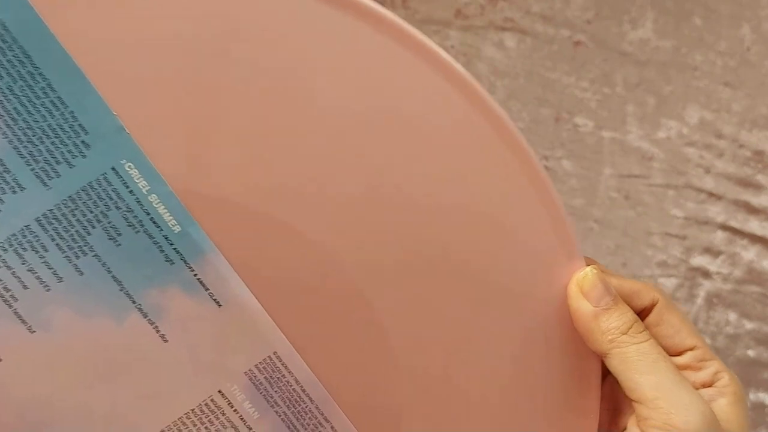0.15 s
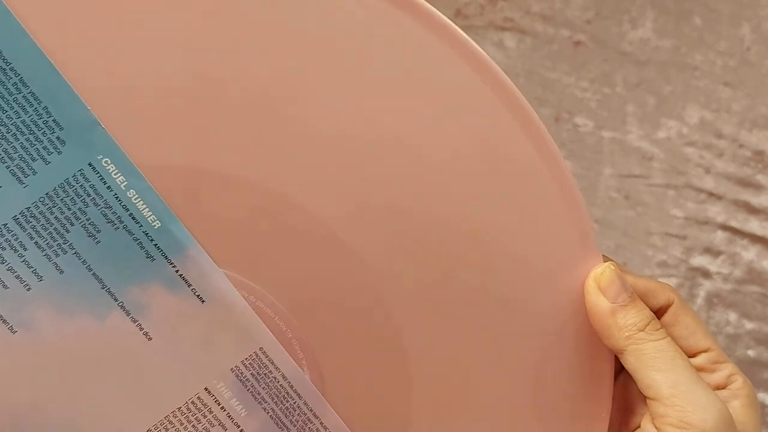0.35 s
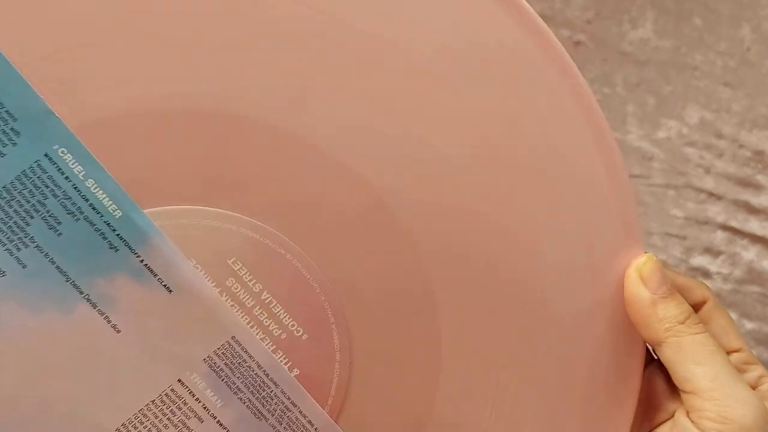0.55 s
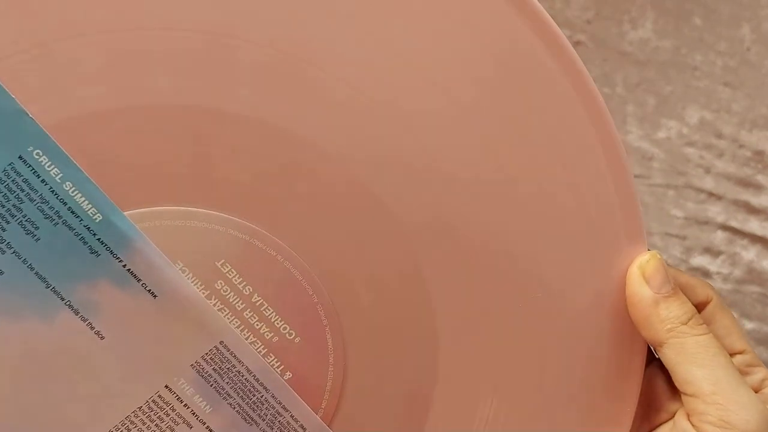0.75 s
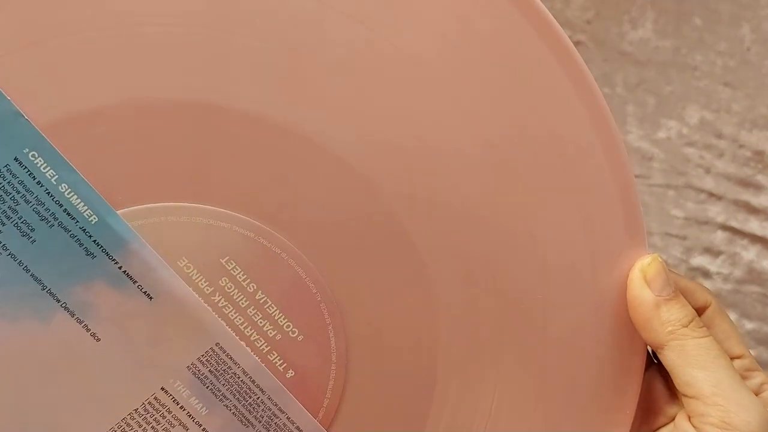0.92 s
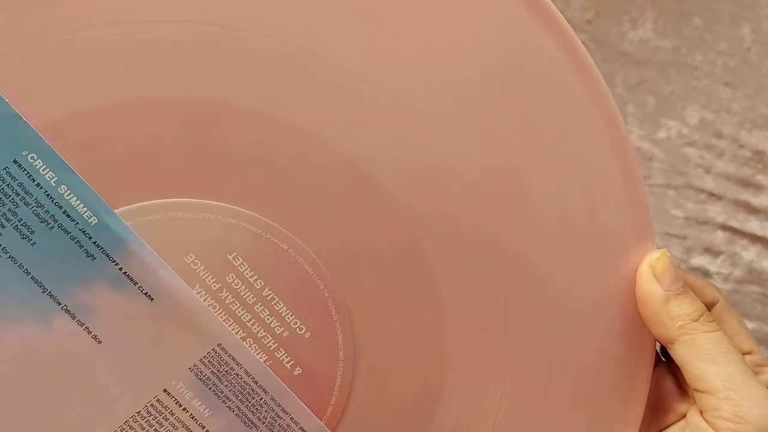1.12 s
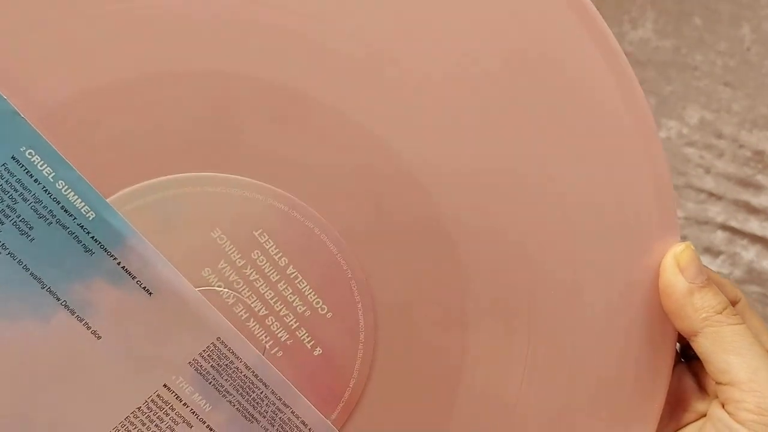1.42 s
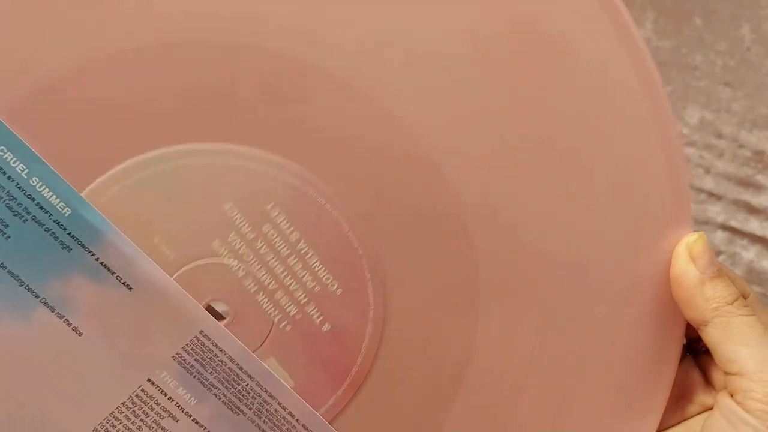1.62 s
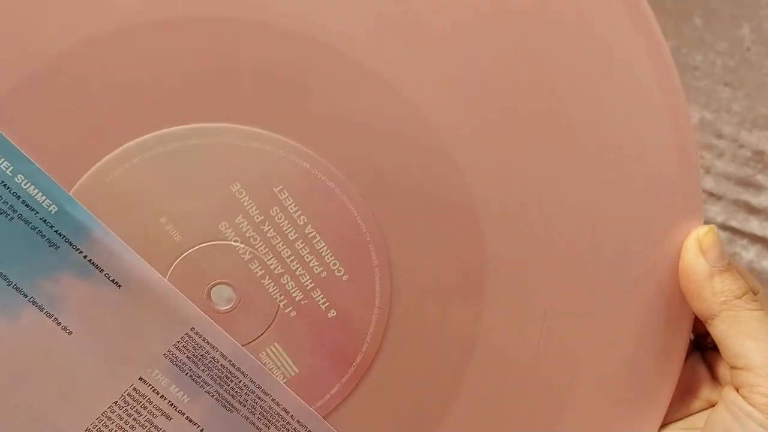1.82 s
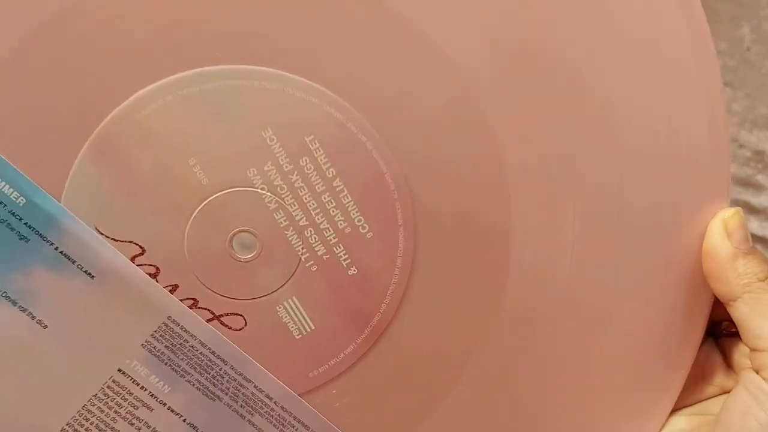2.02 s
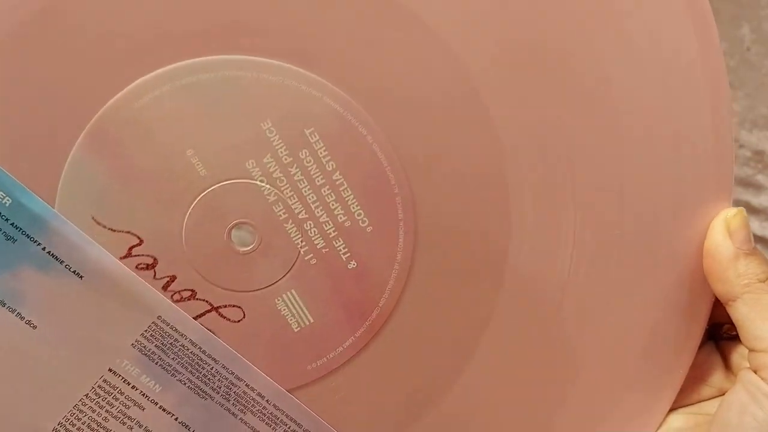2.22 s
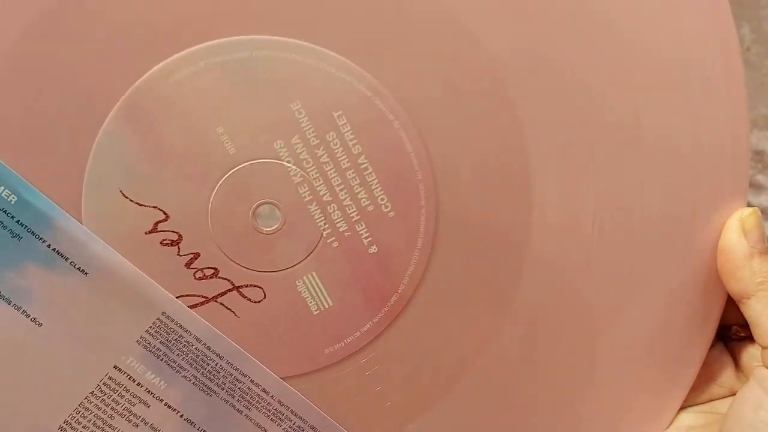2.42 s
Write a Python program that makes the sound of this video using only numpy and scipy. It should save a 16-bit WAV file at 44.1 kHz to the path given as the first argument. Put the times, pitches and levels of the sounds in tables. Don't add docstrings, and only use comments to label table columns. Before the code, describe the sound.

A vinyl record slides from a paper sleeve: harsh rasping jerks with squeaks, snaps and dull knocks, then a near-quiet gap and shorter, softer scrapes, heard very close in a quiet room.

```python
import sys
import numpy as np
from scipy import signal
from scipy.fft import rfft, irfft
from scipy.io import wavfile
from scipy.ndimage import uniform_filter1d

SR = 44100
rng = np.random.default_rng(int(sys.argv[2]) if len(sys.argv) > 2 else 0)


def generate_wav(signal):
    frames = np.transpose(np.atleast_2d(signal))
    scaled = np.clip(frames, -1, 1) * 32767
    pcm = np.round(scaled).astype(np.int16)
    wavfile.write(sys.argv[1], SR, pcm)


def voltage_ratio(decibels):
    exponent = np.asarray(decibels, float) / 20
    return 10 ** exponent


N = 112454


def evened(x):
    return x / np.sqrt(np.mean(x ** 2) + 1e-20)


def smoothed(x, size, axis=-1):
    return uniform_filter1d(uniform_filter1d(x, size, axis=axis), size, axis=axis)


def read_spectrum(points, hz):
    f, db = np.transpose(points)
    return np.interp(np.log(hz + 1), np.log(f + 1), db, left=-90, right=-90)


def coloured(x, points):
    hz = np.fft.rfftfreq(len(x), 1 / SR)
    return evened(irfft(rfft(x) * voltage_ratio(read_spectrum(points, hz)), len(x)))


def add(mix, start_s, sound):
    part = mix[max(round(start_s * SR), 0):][:len(sound)]
    part += sound[:len(part)]


# time in seconds, swell in dB.
CATCHES = [(.016, 4), (.023, 5), (.184, 4), (.268, 3), (.277, 2), (.498, 3), (.118, 4), (.134, 5), (.57, 4),
           (.5735, 4), (1.373, 5), (1.383, 5), (1.394, 5), (1.405, 6), (1.409, 4), (1.419, 4), (1.605, 9),
           (1.625, 5), (1.637, 4), (1.666, 4), (1.673, 5), (1.917, 4), (1.942, 6), (1.948, 6), (1.998, 5),
           (2.009, 5), (2.281, 6), (2.311, 10), (2.333, 14), (2.349, 9), (2.359, 5), (2.371, 5)]


def slips():
    slips_per_s, spread_db = 16000, 0.8
    judder_db, judder_s, mottle_db = 0.7, 0.004, 4.0
    catch_s, catch_hz = 0.0012, 3300

    struck = rng.random(N) < slips_per_s / SR
    size = voltage_ratio(spread_db * rng.exponential(1, N)) * struck * rng.standard_normal(N)
    judder = evened(smoothed(rng.standard_normal(N), round(judder_s * SR)))
    z = signal.stft(size * voltage_ratio(judder_db * judder), nperseg=512, noverlap=384)[2]

    blotches = rng.standard_normal(z.shape)
    blotches = uniform_filter1d(uniform_filter1d(blotches, 2, axis=0), 7, axis=1)
    z = z * voltage_ratio(mottle_db * evened(blotches))
    spray = signal.istft(z, nperseg=512, noverlap=384)[1][:N]

    s, db = np.transpose(CATCHES)
    swell_db = db @ np.exp(-((np.arange(N) / SR - s[:, None]) / catch_s) ** 2)
    hz = np.fft.rfftfreq(N, 1 / SR)
    treble = 1 / (1 + (catch_hz / (hz + 1)) ** 8)
    return rfft(spray) + rfft(spray * (voltage_ratio(swell_db) - 1)) * treble


# frequency in Hz, level in dB per Hz.
PAPER = [(600, -56), (1700, -48), (3200, -14), (5500, -3), (8100, -11), (9000, -4), (12500, -4),
         (15700, -14)]
# time in seconds, level in dB.
HARD_PULLS = [
    [(0, -27), (.012, -34), (.032, -43), (.042, -40), (.078, -57), (.095, -66)],
    [(.08, -62), (.098, -54), (.112, -41), (.2, -26), (.232, -26), (.25, -23), (.278, -23), (.36, -80)],
    [(.365, -80), (.482, -22), (.514, -12), (.552, -12), (.562, -19), (.578, -23), (.625, -60), (.71, -98)],
    [(1.3, -74), (1.334, -64), (1.38, -37), (1.418, -35), (1.44, -44), (1.475, -68), (1.53, -80)],
    [(1.52, -82), (1.574, -58), (1.6, -42), (1.63, -26), (1.652, -29), (1.69, -29), (1.72, -46),
     (1.78, -82)],
    [(1.83, -88), (1.87, -70), (1.916, -37), (1.97, -33), (2.012, -28), (2.04, -48), (2.085, -85)],
]
# centre in Hz, width in Hz, dB over the paper top.
HARD_PATCHES = [
    [(3100, 1200, -5), (4100, 700, 4), (5000, 900, 5), (6300, 900, 3), (10400, 400, 6), (12300, 500, 2)],
    [(1000, 900, -41), (1850, 450, -15), (2750, 900, -4), (5400, 1500, 6), (6600, 700, 3), (9300, 450, 4)],
    [(2600, 900, -1), (4200, 1000, -2), (5300, 800, 6), (6800, 900, 1), (8900, 1000, 3), (10800, 1000, 1)],
    [(2200, 600, -12), (2750, 400, 3), (3700, 600, 4), (4600, 730, 7.5), (5800, 500, 2), (7000, 900, 2),
     (12000, 2200, 3)],
    [(2150, 700, -15), (3400, 900, 1), (4400, 700, 2), (5600, 700, 5), (7300, 700, 1), (11500, 2600, 3)],
    [(3500, 500, -2), (4300, 800, 8.5), (7420, 1000, 5), (12200, 800, 4)],
]
# time in seconds, level in dB.
LIGHT_BRUSHES = [
    [(.8, -95), (.815, -74), (.88, -66), (.93, -72), (.95, -90)],
    [(.95, -89), (1.012, -49), (1.056, -48), (1.19, -96)],
    [(2.13, -98), (2.19, -56), (2.23, -58), (2.3, -80)],
    [(2.2, -88), (2.28, -58), (2.34, -48), (2.38, -53), (2.43, -86)],
    [(2.47, -92), (2.53, -73), (2.55, -62.5)],
]
# centre in Hz, width in Hz, dB over the paper top.
BRUSH_PATCHES = [
    [(5100, 600, 17), (12900, 250, 5), (14700, 250, 3)],
    [(3000, 500, 22), (3800, 600, 35)],
    [(3650, 250, 22), (4200, 480, 32.5)],
    [(4400, 400, 2), (6100, 300, 3), (7700, 800, 19), (8860, 850, 19)],
    [(3500, 300, 5.5), (8700, 500, 22.5)],
]
# time in seconds, level in dB.
EDGE_DRAGS = [
    [(1.21, -95), (1.27, -80), (1.52, -78), (1.6, -95)],
    [(1.95, -60), (2.008, -33), (2.03, -46), (2.075, -75)],
    [(1.6, -90), (1.68, -72), (1.76, -84), (1.83, -78), (1.9, -92)],
    [(2.2, -92), (2.35, -72), (2.55, -82)],
    [(0, -70), (.07, -76), (.25, -80), (.36, -84), (.46, -86), (.5, -90)],
    [(1.86, -90), (1.94, -80), (2.05, -76), (2.1, -90)],
    [(1.56, -80), (1.625, -42), (1.69, -72)],
]
# centre in Hz, width in Hz, dB over the paper top.
EDGE_PATCHES = [
    [(2800, 2000, 20)],
    [(2950, 950, 20)],
    [(1050, 300, 30)],
    [(1050, 500, 30), (1780, 200, 30), (2600, 900, 27)],
    [(1200, 1600, 30)],
    [(1200, 1500, 30)],
    [(2100, 1000, 25)],
]


def jerks():
    drive, out = slips(), np.zeros(N)
    hz, t = np.fft.rfftfreq(N, 1 / SR), np.arange(N) / SR
    paper = voltage_ratio(2 * read_spectrum(PAPER, hz))
    pressures = HARD_PULLS + LIGHT_BRUSHES + EDGE_DRAGS
    contacts = HARD_PATCHES + BRUSH_PATCHES + EDGE_PATCHES
    for pressure, patches in zip(pressures, contacts):
        power = paper.copy()
        for centre_hz, width_hz, db in patches:
            power += voltage_ratio(2 * db) * np.exp(-((hz - centre_hz) / width_hz * 2.1) ** 2)
        rub = evened(irfft(drive * np.sqrt(power), N))
        s, db = np.transpose(pressure)
        out += rub * voltage_ratio(np.interp(t, s, db, left=-120, right=-120))
    return out


# start in seconds, length in
# seconds, first pitch in Hz, last pitch in Hz, level in dB.
SQUEAKS = [(0.465, .018, 2393, 3500, -26), (0.495, 0.015, 2650, 3450, -16), (.504, .026, 2150, 2450, -20.5),
           (.536, .021, 2580, 2600, -15), (.553, .022, 2600, 2600, -27.5), (.505, .014, 5102, 5500, -24),
           (.0, 0.0076, 10350, 10200, -23), (.165, .014, 3140, 3200, -34.5),
           (0.175, 0.013, 1900, 1950, -41.5), (0.269, 0.017, 2800, 2900, -34),
           (1.412, .03, 2750, 2760, -37.5), (1.628, 0.017, 5400, 5800, -29),
           (1.655, 0.028, 1707, 1730, -42.5), (1.925, 0.013, 2013, 2040, -41.5),
           (2.0, 0.019, 2600, 2400, -33), (.85, .06, 2600, 2680, -64), (2.2, .036, 2450, 2470, -68),
           (0, .024, 1250, 980, -50), (.006, .02, 2350, 2320, -46), (.034, .022, 2350, 2300, -51),
           (1.37, .07, 1500, 1380, -61), (1.89, .065, 2080, 2020, -61), (.235, .045, 1560, 1680, -48),
           (.59, .09, 5300, 5200, -68),
           (.005, .016, 6400, 5900, -38), (.006, .015, 4200, 3900, -42), (.036, .02, 4800, 4500, -45),
            (.037, .012, 6200, 6100, -51), (.075, .03, 2750, 2760, -61), (.112, .009, 2650, 2700, -45),
            (.104, .008, 4150, 4100, -45), (.113, .012, 4100, 4150, -47), (.131, .007, 4900, 4850, -41),
            (.465, .012, 4900, 6000, -34), (.532, .008, 2200, 2600, -22), (.85, .07, 5000, 5150, -66),
            (1.401, .02, 3650, 3600, -41), (1.38, .009, 2800, 2800, -44), (1.391, .007, 2850, 2800, -46),
            (1.628, .015, 7000, 7900, -38), (1.669, .012, 5300, 5700, -34), (2.28, .035, 6000, 6050, -63),
            (2.35, .025, 4400, 4450, -65), (2.352, .03, 1800, 1790, -69)]


def squeaks():
    octave_db, waver_depth, flutter_db = -14, 0.006, 3.0
    out = np.zeros(N)
    for start_s, length_s, from_hz, to_hz, db in SQUEAKS:
        u = np.linspace(0, 1, round(length_s * SR))
        drift = evened(uniform_filter1d(rng.standard_normal((2, 4096)), 150))
        waver, flutter = drift[:, :len(u)]
        pitch_hz = (from_hz + (to_hz - from_hz) * u ** 0.7) * (1 + waver_depth * waver)
        phase = 2 * np.pi * np.cumsum(pitch_hz) / SR
        tone = np.sin(phase) + voltage_ratio(octave_db) * np.sin(2 * phase)
        level_db = db + 2.5 + flutter_db * flutter * min(length_s / 0.04, 1.5)
        add(out, start_s, voltage_ratio(level_db) * np.sin(np.pi * u) ** 0.9 * tone)
    return out


# frequency in Hz, level in dB per Hz.
ROOM = [(18, -9), (42, -7), (65, 0), (110, -8), (220, -15), (330, -13), (520, -30), (800, -48)]
# frequency in Hz, level in dB per Hz.
HISS = [(400, 1), (1200, -3), (3000, -2), (6000, -9), (8300, -7), (8900, 1), (12000, -3), (15000, -10)]


def room():
    room_db, lump_db, hiss_db = -62.5, 1.6, -83
    air, electronics, drift = rng.standard_normal((3, N))
    lumps = evened(smoothed(drift, 1500))
    tone = voltage_ratio(room_db + lump_db * lumps) * coloured(air, ROOM)
    return tone + voltage_ratio(hiss_db) * coloured(electronics, HISS)


def bursts(events, centre_hz, width_hz, rise_s):
    out, t = np.zeros(N), np.arange(512) / SR
    band = np.exp(-((np.fft.rfftfreq(512, 1 / SR) - centre_hz) / width_hz) ** 4)
    envelope = t / rise_s * np.exp(1 - t / rise_s)
    for s, db in events:
        bright = irfft(rfft(rng.standard_normal(512)) * band, 512)
        add(out, s - rise_s, voltage_ratio(db) * evened(bright) * envelope)
    return out


# time of the peak in seconds, peak in dB.
SNAPS = [
    (.1075, -36),
    (.222, -23),
    (.252, -27),
    (1.63, -32),
    (1.643, -30),
    (2.01, -37),
]


def snaps():
    return bursts(SNAPS, centre_hz=6800, width_hz=3500, rise_s=0.001)


# time of the peak in seconds, peak in
# dB.
TICKS = [(.339, -62), (.814, -68), (.828, -71), (.849, -71), (.873, -69), (.922, -73), (.934, -72),
         (.994, -73), (1.207, -80), (1.263, -76), (1.307, -70), (1.455, -74), (1.755, -72), (1.824, -72),
         (2.184, -70), (2.221, -72), (2.281, -66), (2.311, -54), (2.333, -57), (2.421, -68)]


def bright_ticks():
    return bursts(TICKS, centre_hz=11000, width_hz=4000, rise_s=0.001)


# time in seconds, peak in dB.
THUMPS = [
    (.516, -23),
    (.551, -27),
    (.528, -30),
]


def thumps():
    thump_s = 0.0004
    u = np.arange(2048) / SR / thump_s
    push = u * np.exp(1 - u) * (1 - u / 5)
    out = np.zeros(N)
    for s, db in THUMPS:
        add(out, s, voltage_ratio(db) * push)
    return out


def scene():
    mix = jerks() + squeaks() + room() + snaps() + bright_ticks() + thumps()
    return mix[None]


def top_cut(x):
    return signal.sosfilt(signal.butter(12, 15790, fs=SR, output="sos"), x)


def record(dry):
    overload, lopsided, edge_hz = 0.48, 0.08, 15800
    limit = overload * (1 + lopsided * np.sign(dry))
    clipped = dry / (1 + abs(dry / limit) ** 4) ** 0.25
    lowpass = signal.firwin(511, edge_hz, window=("kaiser", 9), fs=SR)
    finished = signal.oaconvolve(clipped, lowpass[None], "same")
    return top_cut(finished)


dry = scene()
out = record(dry)
generate_wav(out)
```